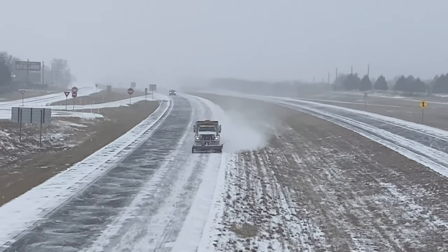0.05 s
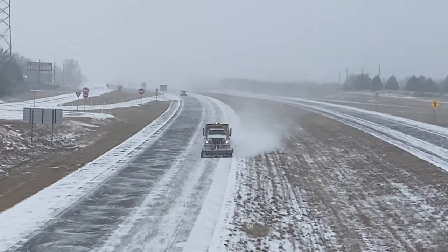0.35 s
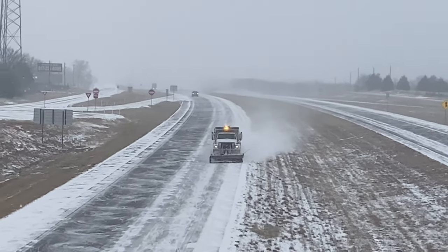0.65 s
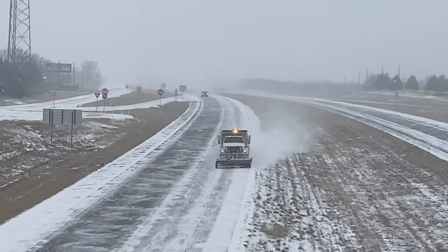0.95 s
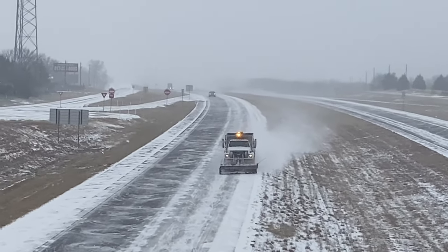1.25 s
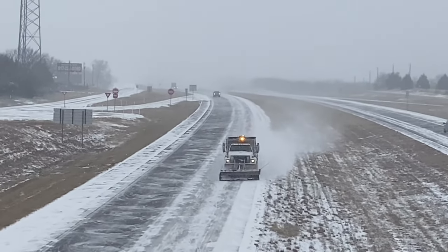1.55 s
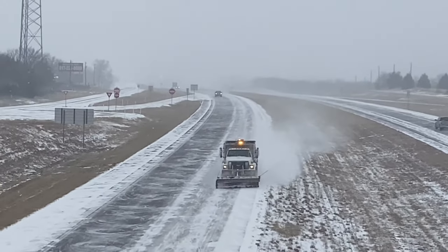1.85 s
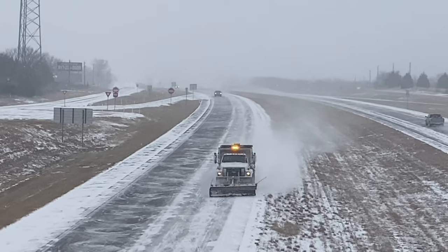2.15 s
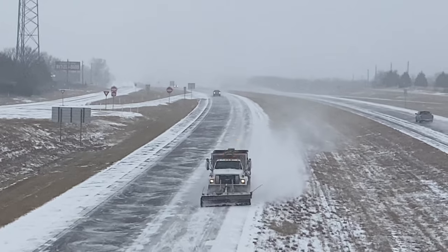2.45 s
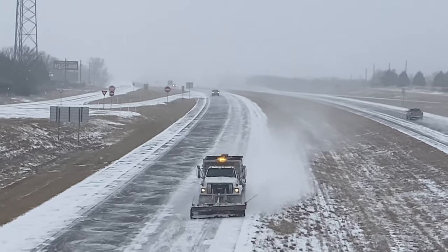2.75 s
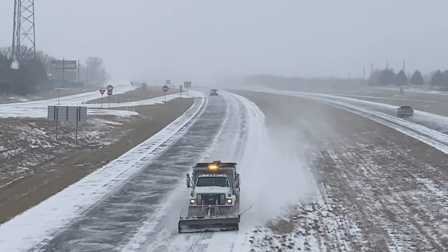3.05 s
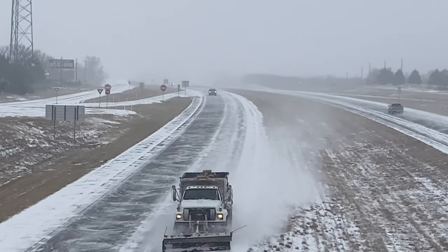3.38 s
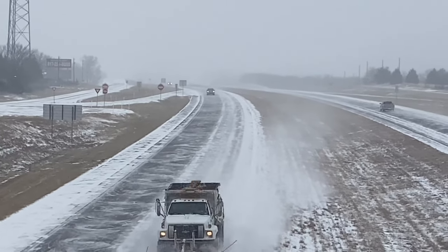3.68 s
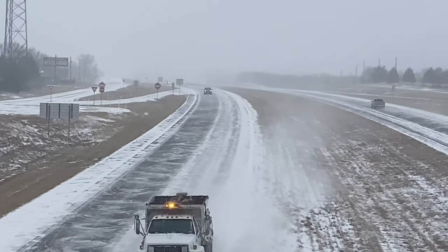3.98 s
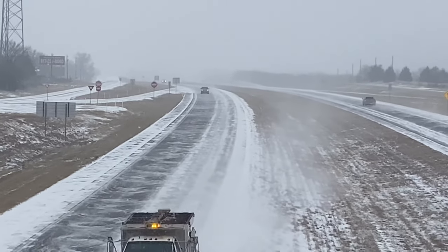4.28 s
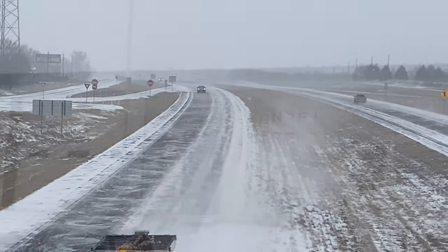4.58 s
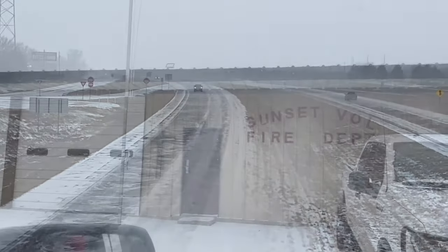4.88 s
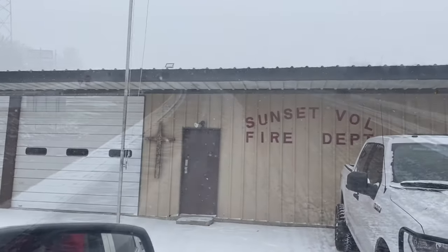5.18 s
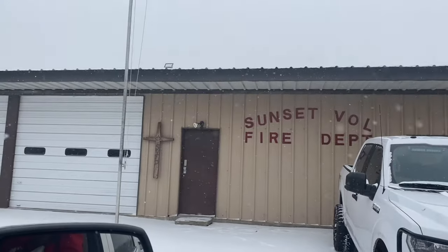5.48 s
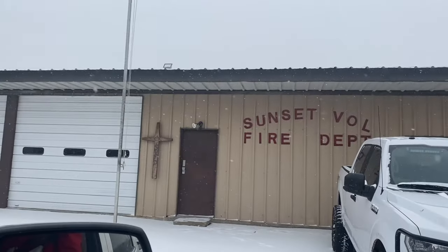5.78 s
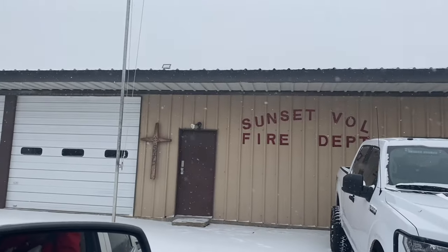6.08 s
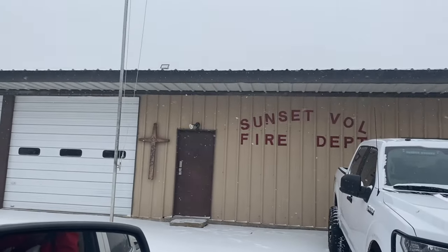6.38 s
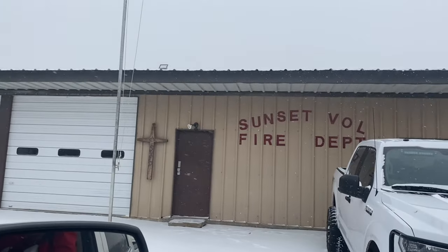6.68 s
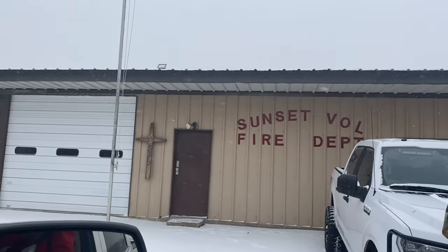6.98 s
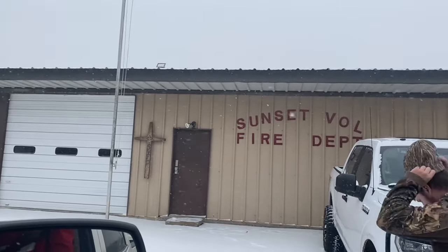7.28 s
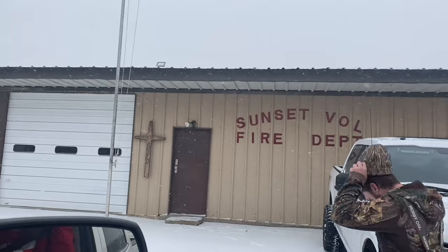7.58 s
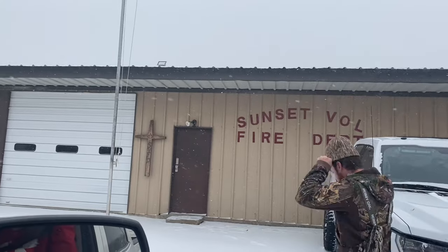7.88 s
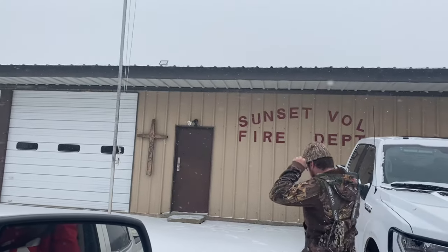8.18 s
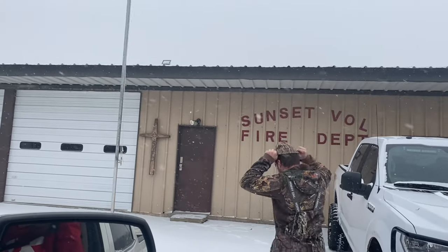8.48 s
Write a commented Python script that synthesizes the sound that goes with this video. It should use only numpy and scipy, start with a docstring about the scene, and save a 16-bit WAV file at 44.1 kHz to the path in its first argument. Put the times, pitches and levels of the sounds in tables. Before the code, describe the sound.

Heard from inside an idling car, a snowplough approaches, its diesel drone and tyre roar growing as the steel blade scrapes, clangs and briefly squeals on the road. The plough fades as heater air comes in. A jacket rustles, then two doors slam one after the other, booming in the cabin. Small ticks, soft bumps and faint steps in snow follow over the idle.

```python
"""A diesel drones and a steel blade scrapes and jolts along the road: a snowplough nears an idling car,
dulled by the windows. Exhaust pulses make the drone; friction and impacts excite the blade's resonances.
The scene dissolves to a parked cabin where air rushes from the heater. A jacket slides off a seat, two
doors slam and set the enclosed air booming in its modes, and ticks, soft bumps and faint steps follow."""
import sys
import numpy as np
from scipy import signal
from scipy.fft import rfft, irfft, next_fast_len
from scipy.io import wavfile
from scipy.ndimage import map_coordinates

SR = 44100
rng = np.random.default_rng(int(sys.argv[2]) if len(sys.argv) > 2 else 0)


def unload_wav(signal):
    """Save mono or channel-first audio to the path in sys.argv[1] as 16-bit WAV at rate SR, clipped to [-1, 1]."""
    wavfile.write(
        sys.argv[1],
        SR,
        np.round(np.clip(np.atleast_2d(signal).T, -1, 1) * 32767).astype(np.int16),
    )


N = 381024
TIME = np.arange(N) / SR


def amp(db):
    return 10 ** (np.asarray(db) / 20)


def unit(x):
    return x / np.sqrt(np.mean(x ** 2) + 1e-20)


def along(points, hz):
    """Interpolates (Hz, value) points on a logarithmic frequency axis."""
    f, v = np.transpose(points)
    return np.interp(np.log(hz + 1), np.log(f + 1), v)


def curve(points):
    """Interpolates (seconds, value) points at every sample."""
    return np.interp(TIME, *np.transpose(points))


def ramp(start_s, end_s):
    """Rises from 0 to 1 between two times."""
    return np.clip((TIME - start_s) / (end_s - start_s), 0, 1)


def wobble(rate, t=TIME):
    """A smooth random curve with `rate` knots a second."""
    return map_coordinates(rng.standard_normal(int(t[-1] * rate) + 4), [t * rate])


def filtered(x, response):
    """Multiplies the spectrum of x by a frequency response."""
    n = x.shape[-1]
    m = next_fast_len(n + 8192, real=True)
    return irfft(rfft(x, m) * response(np.fft.rfftfreq(m, 1 / SR)), m)[..., :n]


def sides(lean_db):
    """Left and right gains for an interaural level difference."""
    return amp(np.array([np.atleast_1d(lean_db), -np.atleast_1d(lean_db)]) / 2)


def coloured(pair, spectrum, coherence):
    """Mid-side mixing: two independent noises become stereo with a set spectrum and correlation."""
    turn = lambda hz: np.arccos(np.clip(along(coherence, hz), -1, 1)) / 2
    mid, side = filtered(pair, lambda hz: amp(along(spectrum, hz)) * [np.cos(turn(hz)), np.sin(turn(hz))])
    return unit(np.array([mid + side, mid - side]))


def rush(spectrum, coherence, samples=N):
    """Steady stereo noise."""
    return coloured(rng.standard_normal((2, samples)), spectrum, coherence)


def grainy(spectrum, coherence, rate, spread_db):
    """Random amplitude modulation breaks stereo noise into grains."""
    return coloured(rng.standard_normal((2, N)) * amp(spread_db * wobble(rate)), spectrum, coherence)


def rise(t, attack):
    """Exponential onset with a time constant in seconds."""
    return 1 - np.exp(-t / attack)


def impact(t, attack, t60, tail_db, tail_t60):
    """Double-slope decay: a fast rise, a quick fall and a weaker tail."""
    return rise(t, attack) * (amp(-60 * t / t60) + amp(tail_db - 60 * t / tail_t60))


def blows(times, levels_db, attack, t60):
    """The envelope of many impacts; being incoherent, they add in power."""
    power = np.zeros(N + SR)
    shape = impact(TIME[:SR], attack, t60, tail_db=-60, tail_t60=0.3)
    for s, db in zip(times, levels_db):
        power[round(s * SR):][:SR] += (amp(db) * shape / shape.max()) ** 2
    return np.sqrt(power[:N])


def strokes(times, lengths, levels_db, attack, t60):
    """The envelope of strokes that rise, hold and decay, adding in power."""
    t, power = TIME[:2 * SR], np.zeros(N + 2 * SR)
    for s, length, db in zip(times, lengths, levels_db):
        shape = rise(t, attack) * amp(-60 * np.maximum(t - length, 0) / t60)
        power[max(round(s * SR), 0):][:2 * SR] += (amp(db) * shape) ** 2
    return np.sqrt(power[:N])


def modes(hz, gains, t):
    """Sinusoids of random phase, one a row, with a fixed total power."""
    phase = rng.uniform(0, 2 * np.pi, hz.shape)
    return gains / np.linalg.norm(gains) * np.sin(2 * np.pi * hz * t + phase)


def add(track, s, sound):
    """Mixes a short sound into a stereo track at time s."""
    room = track[:, round(s * SR):][:, :sound.shape[-1]]
    room += sound[..., :room.shape[1]]


# Interaural coherence of sound from outside the car. Each row: frequency in Hz, correlation.
OUTSIDE = [(50, 0.96), (150, 0.96), (500, 0.79), (1500, 0.78), (4000, 1)]
# The diesel's firing. Each row: time in seconds, firing rate in Hz.
FIRING_RATE = [(0, 122), (1.2, 123), (2.6, 119), (3.4, 118), (4.0, 119), (4.5, 121), (5.2, 112)]
# Spectra of the exhaust pipe and the tyres. Each row: frequency in Hz, relative level in dB.
PIPE_SPECTRUM = [(50, -41.5), (105, 6.5), (120, 8.5), (140, 4.5), (240, -13), (400, -2), (700, -61),
                 (3000, -120)]
TYRE_SPECTRUM = [(15, -53), (60, -23.5), (100, 3.5), (160, -0.5), (205, -7), (255, 1), (310, -14),
                 (420, -9), (700, -21), (1500, -61.5), (4000, -120)]
# The truck's roar swells and sinks. Each row: time in seconds, gain in dB.
ROAR_SWELL = [(0, 6), (1.3, 1.5), (1.7, 2), (2.1, -4), (2.65, -1), (2.95, 1), (3.45, 0), (3.8, -1.5),
              (4.25, 0), (4.75, 0)]
def truck():
    """Spherical spreading: exhaust pulses and tyre roar vary in amplitude inversely with distance."""
    pass_s, speed_m_per_s, nearest_m = 4.15, 23.3, 12.6
    nearness = nearest_m / np.hypot(nearest_m, speed_m_per_s * (TIME - pass_s))
    cycles = np.cumsum(curve(FIRING_RATE) * (1 + 0.04536 * wobble(40))) / SR
    firings = np.diff(np.floor(cycles), prepend=0) * amp(4.8 * wobble(50))
    drone = unit(filtered(firings, lambda hz: amp(along(PIPE_SPECTRUM, hz))))
    exhaust = amp(-32) * unit(drone + 0.5 * rush(PIPE_SPECTRUM, OUTSIDE))
    ruts_db = 2.5 * wobble(32)  # the tyres thud over packed snow
    tyres = amp(-32 + 1.5 * wobble(6.2) + ruts_db) * rush(TYRE_SPECTRUM, OUTSIDE)
    return nearness * amp(curve(ROAR_SWELL)) * (exhaust + tyres)


# The blade's resonances, whose strengths depend on the angle of view.
# Each row: frequency in Hz, bandwidth in Hz, gain from afar in dB, gain from nearby in dB.
STEEL_MODES = [(268.8, 6.7, 21, 4), (408, 73, 7.5, 13.5), (521.2, 18, 17, -7.5), (682, 41, -7, 5.5),
               (762.4, 25, 0.5, 10.5), (827.3, 18, 9, 3.5), (1001, 5.9, 13.5, 0), (1032, 13, 5, 4),
               (1259, 24, 4.5, 11), (1323, 44, -11, 8.5), (1550, 56, 8, 7.5), (1668, 44, 1.5, 9.5),
               (1984, 5.8, 0.5, 13.5), (2298, 37, 6.5, 7.5), (2464, 200, 6.5, -3)]
FLEX_PER_S, FLEX_SHARE, FLEX_DB = 14, 0.011, 3.6  # pace of the flexing, swing of pitch, swing of gain
def through_steel(x, modes_db, treble_db):
    """Resonant filtering: each mode wanders as the blade flexes, and a shelf sets the treble."""
    f, t, spectra = signal.stft(x.astype(np.float32), SR, nperseg=4096)
    f, power = f[:, None], 1
    for (hz, width, *_), db in zip(STEEL_MODES, modes_db):
        centre = hz * (1 + FLEX_SHARE * wobble(FLEX_PER_S, t))
        strength = unit(amp(FLEX_DB * wobble(FLEX_PER_S, t)))
        power = power + (amp(db) * strength) ** 2 / (1 + (2 * (f - centre) / width) ** 2)
    shelf = amp(treble_db * np.minimum(f / 4000, 1) ** 4)
    return signal.istft(spectra * shelf * np.sqrt(power), SR, nperseg=4096)[1][..., :N]


# The blade bites into the asphalt.
# Each row: start in seconds, length in seconds, scrape level in dB, grit relative to the scrape in dB.
BITES = [(0.073, 0.52, -40, -40), (0.587, 0.35, -43, -12), (0.961, 0.038, -36, -17), (1.1, 0.1, -40.5, -22),
         (1.243, 0.14, -36, -18), (1.425, 0.26, -33, -12), (1.736, 0.059, -34, -7.5),
         (1.843, 0.037, -36, -5.5), (1.89, 0.25, -49.5, -5.5), (2.175, 0.069, -38, -12.5),
         (2.247, 0.14, -35, -21.5), (2.494, 0.032, -37, -8), (2.561, 0.026, -37, -8.5),
         (2.681, 0.15, -38.5, -13), (2.861, .25, -33, -17.5), (3.119, 0.17, -35.5, -7),
         (3.292, 0.022, -29.5, -13), (3.326, 0.015, -30.5, -3.5), (3.422, 0.025, -28.5, -9.5),
         (3.375, .04, -47, -12), (3.462, .085, -39.5, -15), (3.55, 0.058, -31, -10),
         (3.604, 0.042, -34, -12), (3.716, 0.25, -35.5, -11.5), (3.977, 0.13, -37, -5),
         (4.128, 0.24, -36, -11), (4.362, 0.17, -37.5, -13), (4.54, 0.23, -33.5, -15)]
# The blade jolts on the road. Each row: start in seconds, level in dB, centre of the ringing in Hz.
JOLTS = [(0.096, -29, 523), (0.163, -31, 825), (0.265, -34.5, 810), (0.488, -27, 530), (0.598, -29.5, 503),
         (0.672, -32, 530), (0.802, -28.5, 820), (0.953, -23.5, 517), (1.1, -27.5, 1030),
         (1.192, -25.5, 517), (1.228, -26, 517), (1.427, -21, 495), (1.468, -23, 516), (1.719, -22.5, 1000),
         (1.804, -22, 1300), (1.847, -23, 814), (2.42, -21, 480), (2.488, -25, 480), (2.592, -26.5, 400),
         (2.784, -24, 835), (2.861, -26.5, 785), (2.934, -23, 763), (3.038, -19.5, 910),
         (3.153, -18.5, 860), (3.344, -26.5, 400), (3.431, -16, 400), (3.557, -21.5, 400),
         (3.609, -23, 402), (3.89, -26, 400), (4.041, -21.5, 400), (4.298, -22, 980), (4.5, -26.5, 1260)]
# Spectra of the scrape and its gritty edge. Each row: frequency in Hz, relative level in dB.
SCRAPE_SPECTRUM = [(20, -58), (150, -29.5), (250, -12), (380, -2.5), (520, -3.5), (650, -2), (1000, -2),
                   (1400, -5.5), (1750, -16.5), (2200, -34.5), (3200, -27), (4200, -75), (8000, -120)]
GRIT_SPECTRUM = [(600, -39), (1400, 6.5), (2000, 5.5), (2500, 4), (3100, 1), (3700, -17.5), (4400, -18),
                 (4800, -32.5), (5300, -35.5), (6200, -45), (7500, -46), (9000, -62.5), (12000, -66.5)]
def blade():
    """Forced vibration: friction noise from dragging, biting and jolting drives the steel's modes."""
    drag_db, drag_grit_db = -42, -55
    start, length, bite_db, grit_db = np.transpose(BITES)
    scrape = np.hypot(amp(drag_db), strokes(start, length, bite_db, attack=0.005, t60=0.27))
    rasp = np.hypot(amp(drag_grit_db), strokes(start, length, bite_db + grit_db, attack=0.005, t60=0.27))
    jolt_s, jolt_db, _ = np.transpose(JOLTS)
    chatter = unit(amp(0.3 * wobble(15) + 0.8 * wobble(50) + 1.5 * wobble(140)))
    # The edge eases off the road just before each jolt.
    lift = blows(jolt_s - 0.02, np.full_like(jolt_s, -7), attack=0.01, t60=0.05)
    contact = chatter / (1 + lift)
    body = np.hypot(scrape * contact, blows(jolt_s, jolt_db - 9.5, attack=0.001, t60=0.087))
    edge = np.hypot(rasp * contact, blows(jolt_s, jolt_db - 33.5, attack=0.0026, t60=0.12))
    grind = grainy(SCRAPE_SPECTRUM, OUTSIDE, rate=600, spread_db=1.5)
    grit = grainy(GRIT_SPECTRUM, OUTSIDE, rate=560, spread_db=1.5)
    # The distant timbre, its treble absorbed by the air, gives way to the near one.
    near = ramp(1.4, 4.23)
    _, _, far_db, near_db = np.transpose(STEEL_MODES)
    out = np.zeros((2, N))
    for share, modes_db, treble_db in (1 - near, far_db, -4), (near, near_db, 1):
        low, high = through_steel(np.array([grind, grit]), modes_db, treble_db)
        out += share * (body * unit(low) + edge * unit(high))
    return out


# Interaural coherence of sound in the cabin. Each row: frequency in Hz, correlation.
INSIDE = [(45, 1), (100, 0.51), (250, 0.028), (1000, 0.041), (5000, 0.065)]
# The cabin's rumble. Each row: frequency in Hz, relative level in dB.
RUMBLE_SPECTRUM = [(15, -25), (30, -20.5), (42, -20.5), (54, 0.5), (70, -4), (95, -7), (130, -14.5),
                   (220, -16.5), (300, -29), (600, -33), (1200, -86), (3000, -120)]
def idle():
    """Structure-borne sound: the car's engine hums at its firing rate and shakes the cabin."""
    firing_hz, fall_db_per_s = 42.83, 0.23
    phase = 2 * np.pi * np.cumsum(firing_hz * (1 + 0.0039 * wobble(15))) / SR
    fundamental = amp(-37 + wobble(6.9)) * np.sin(phase)
    octave = amp(-47 + 2.4 * wobble(4.6)) * np.sin(2 * phase)
    rumble_db = -37 - fall_db_per_s * TIME + 1.4 * wobble(5.4)
    return fundamental + octave + amp(rumble_db) * rush(RUMBLE_SPECTRUM, INSIDE)


# Faint flares of bright hiss. Each row: start in seconds, length in seconds, level in dB.
HISS_FLARES = [(0.015, 0.71, -81.5), (0.113, 0.12, -81.5), (0.599, 0.016, -72), (0.663, 0.051, -79),
               (1.869, 0.013, -73), (2.184, .17, -83.5), (2.592, 0.017, -71), (2.662, .19, -76.5),
               (2.747, 0.032, -68), (2.935, 0.016, -63), (4.033, 0.08, -72), (4.184, 0.022, -63),
               (4.278, .025, -66)]
# Their spectrum. Each row: frequency in Hz, relative level in dB.
FLARE_SPECTRUM = [(2500, -30.5), (3500, -9), (3850, 5.5), (4450, 1.5), (4800, -20), (6000, -39.5)]
def hiss_flares():
    """Amplitude-modulated band noise: faint flares of bright hiss near 4 kHz during the scrape."""
    envelope = strokes(*np.transpose(HISS_FLARES), attack=0.007, t60=0.14)
    return envelope * grainy(FLARE_SPECTRUM, OUTSIDE, rate=240, spread_db=4)


def clangs():
    """Free vibration: after each jolt the blade's modes ring on, favouring those near its pitch."""
    ring_t60, tilt_db_per_octave = 0.19, -16.5
    out, t = np.zeros((2, N)), TIME[:SR // 2]
    hz, _, far_db, near_db = np.transpose(STEEL_MODES)[:, :, None]
    for s, db, centre_hz in JOLTS:
        octaves_off = np.abs(np.log2(hz / centre_hz))
        gains = amp((far_db + near_db) / 4 + tilt_db_per_octave * octaves_off + rng.normal(0, 2.2, hz.shape))
        flexed_hz = hz * (1 + FLEX_SHARE * rng.standard_normal(hz.shape))
        envelope = amp(db - 8 - 60 * t / ring_t60) * rise(t, 0.002)
        add(out, s, envelope * modes(flexed_hz, gains, t).sum(axis=0))
    return out


# Soft blows on the car's body. Each row: start in seconds, level in dB, frequency in Hz.
BUMPS = [(0.308, -21, 133), (3.009, -21, 72.3), (4.46, -14, 63), (4.654, -16.5, 64), (6.088, -23, 140),
         (6.165, -30, 136), (6.637, -31, 67.5), (7.112, -26.5, 87), (7.54, -28, 80), (7.687, -26, 135),
         (8.594, -27.5, 58)]
# A dull knock on the body or a door. Each row: frequency in Hz, relative level in dB.
KNOCK_SPECTRUM = [(15, -34), (50, -14.5), (100, 11.5), (150, 1), (230, -1.5), (330, -10.5), (480, -17),
                  (1000, -66), (4000, -120)]
def bumps():
    """Heavy damping: the body swings once or twice, with a dull puff that grows with the pitch."""
    out, t = np.zeros((2, N)), TIME[:SR // 4]
    for s, db, hz in BUMPS:
        swell = t * hz / 0.67
        add(out, s, amp(db) * swell * np.exp(1 - swell) * np.sin(2 * np.pi * hz * t))
    s, db, hz = np.transpose(BUMPS)
    puffs = blows(s, db + 9 * np.log2(hz / 170), attack=0.0031, t60=0.088)
    return out + puffs * rush(KNOCK_SPECTRUM, OUTSIDE)


# The blade sings. Each row: start in seconds, length in seconds, level in dB, pitch in Hz,
# waver as a share of the pitch.
SQUEALS = [(1.465, 0.24, -40, 408.2, 0.0055), (1.56, 0.074, -37, 1008, 0.012),
           (1.578, 0.11, -41, 825, .012), (1.736, 0.034, -37.5, 1013, 0.0038),
           (1.78, 0.032, -41, 762, 0.0063), (1.853, 0.11, -49, 822, 0.0056),
           (2.253, 0.08, -41.5, 993, 0.0058), (2.258, 0.051, -39.5, 804, 0.014),
           (2.76, 0.04, -42, 828, 0.013), (2.92, 0.11, -44.5, 760, 0.007), (3.025, 0.18, -43, 1285, .02),
           (3.14, 0.053, -40.5, 1100, 0.011), (3.3, 0.031, -36, 878, .025), (4.34, 0.47, -44.5, 797, 0.021),
           (4.578, .04, -39.5, 630, 0.0147), (4.66, 0.053, -40, 1308, 0.012)]
def squeals():
    """Stick-slip friction: the catching edge sustains rough, wavering notes."""
    out = np.zeros(N)
    for s, length, db, hz, waver in SQUEALS:
        phase = 2 * np.pi * np.cumsum(hz * (1 + waver * wobble(90))) / SR
        tone = unit(amp(1.5 * wobble(45)) * np.sin(phase))
        out += strokes([s], [length], [db], attack=0.011, t60=0.25) * tone
    return out


# Snow flies off the blade. Each row: start in seconds, length in seconds, level in dB.
SPRAYS = [(3.336, 0.21, -85), (4.035, 0.08, -74.5), (4.13, 0.22, -78)]
# Its spectrum. Each row: frequency in Hz, relative level in dB.
SPRAY_SPECTRUM = [(3000, -6), (5000, 6.5), (5800, -12), (7300, -3), (8300, -18.5), (12000, -37.5)]
def snow_spray():
    """Granular noise: fine grains of thrown snow merge into a hiss."""
    envelope = strokes(*np.transpose(SPRAYS), attack=0.012, t60=0.16)
    return envelope * grainy(SPRAY_SPECTRUM, OUTSIDE, rate=200, spread_db=3)


# Air leaving the vents. Each row: frequency in Hz, relative level in dB.
VENT_SPECTRUM = [(60, -23), (160, -17.5), (280, -4), (410, -3.5), (560, -2.5), (790, -8.5), (1200, -12),
                 (1950, -16.5), (2420, -12.5), (2900, -17), (3500, -27), (4900, -24.5), (5700, -32.5),
                 (6500, -30), (7300, -40.5), (8200, -37.5), (9200, -56), (12000, -77.5)]
def heater():
    """Turbulent flow hisses from the vents while the blower's bearing chirps at random times."""
    chirp_hz, chirp_s = 4760, 0.016
    out = amp(-51 + 0.5 * wobble(5)) * rush(VENT_SPECTRUM, INSIDE) * sides(2.9)
    t = TIME[:SR // 20]
    swell = np.sin(np.pi * np.minimum(t / chirp_s, 1)) ** 2
    for when, pitch, glide, strength, side in rng.uniform(-1, 1, size=(170, 5)):
        hz = chirp_hz * (1 + 0.02 * pitch + 0.02 * glide * t / chirp_s)
        chirp = amp(-66.5 + 4.4 * strength) * swell * np.sin(2 * np.pi * np.cumsum(hz) / SR)
        add(out, (when + 1) / 2 * N / SR, chirp * sides(4 * side))
    return out


# A jacket slides over the seat, then stirs. Each row: start in seconds, length in seconds, level in dB.
JACKET_PULLS = [(4.604, 0.11, -50.5), (4.746, 0.086, -50), (4.89, 0.093, -64), (6.62, 0.089, -73),
                (7.15, 0.09, -75), (7.917, .07, -66), (8.295, 0.24, -70)]
# Its creases snap. Each row: start in seconds, level in dB.
CREASES = [(4.625, -31.5), (4.6932, -41), (4.748, -41), (4.775, -40.5), (4.862, -34), (4.873, -39),
           (4.9, -39)]
# The cloth's spectrum. Each row: frequency in Hz, relative level in dB.
CLOTH_SPECTRUM = [(1290, -30), (2200, -5), (2680, -2.5), (3260, -5), (3850, -2), (6200, -4.5), (9130, -15),
                  (11900, -93), (20100, -120)]
def jacket():
    """Friction and buckling: stiff cloth rubs in fine grains and snaps at its creases."""
    s, db = np.transpose(CREASES)
    rubs = strokes(*np.transpose(JACKET_PULLS), attack=0.02, t60=0.17)
    snaps = blows(s, db - 6.5, attack=0.0022, t60=0.081)
    return np.hypot(rubs, snaps) * grainy(CLOTH_SPECTRUM, INSIDE, rate=2000, spread_db=3) * sides(1.5)


# Latches, seals and trim strike as the doors shut. Each row: start in seconds, clack level in dB,
# clack pitch in Hz, crack level in dB, knock level in dB, left minus right in dB.
DOOR_CONTACTS = [(5.096, -18.5, 630, -39, -35, -3.5), (5.108, -15, 940, -27.5, -21, -1),
                 (5.114, -16.5, 479, -36.5, -17.5, -12.5), (5.119, -16, 250, -46, -30, -2),
                 (5.136, -21.5, 560, -33.5, -20, -3.5), (5.159, -29, 1190, -36, -17.5, 3.5),
                 (5.239, -41.5, 1180, -67, -38, -11), (5.32, -41.5, 596, -58.5, -41, 6),
                 (5.822, -34, 700, -61.5, -26, -1.5), (5.829, -23.5, 800, -49, -23, 3),
                 (5.843, -12.5, 1046, -24.5, -17, -1), (5.847, -9, 334, -33.5, -10.5, 1),
                 (5.871, -20.5, 330, -34.5, -11.5, -2), (5.88, -29.5, 1300, -41.5, -34, 1),
                 (5.899, -24, 324, -43, -20.5, -1), (5.908, -31, 1470, -46, -35, 0),
                 (5.917, -33, 590, -42.5, -23, 8.5), (5.935, -29.5, 940, -47.5, -37, 0),
                 (5.945, -31, 1040, -53, -38, -4), (5.981, -38.5, 1050, -59, -35, -7),
                 (6.089, -34.5, 690, -48, -26.5, 9.5), (6.166, -55, 330, -57, -35.5, 5)]
# The door panels' modes. Each row: frequency on the first door in Hz, on the second door in Hz,
# relative level in dB, 60 dB decay time in seconds.
PANEL_MODES = [(216, 235, 6, .2), (294, 250, 1, 0.12), (422, 340, -2, .18), (519, 570, -4, 0.21),
               (638, 710, -5, 0.16), (778, 950, -5.5, 0.14), (954, 1060, -2.5, 0.11),
               (1040, 1400, -14, 0.15), (1220, 1450, -5, 0.093)]
# Spectra of a part's clack and the latch's crack. Each row: frequency in Hz, relative level in dB.
CLACK_SPECTRUM = [(120, -24), (300, 8.5), (480, 5.5), (680, 0), (900, -5.5), (1300, -7), (1600, -11),
                  (1900, -11), (2600, -20.5), (5000, -63), (9000, -120)]
CRACK_SPECTRUM = [(900, -28.5), (2000, 2), (2800, 4), (4000, -1), (6000, -4), (8300, -15), (9100, -23.5),
                  (9800, -41), (12000, -42.5)]
# Interaural coherence of the doors. Each row: frequency in Hz, correlation.
DOOR_COHERENCE = [(60, 0.36), (300, 0.24), (1000, 0.13), (5000, .06)]
def doors():
    """Impact excitation: each contact cracks the latch, clacks a part, and knocks and rings a panel."""
    second_door_s = 5.6
    out, t = np.zeros((2, N)), TIME[:SR // 2]
    noise = lambda spectrum: rush(spectrum, DOOR_COHERENCE, len(t))
    first_hz, second_hz, mode_db, mode_t60 = np.transpose(PANEL_MODES)[:, :, None]
    for s, clack_db, clack_hz, crack_db, knock_db, lean_db in DOOR_CONTACTS:
        resonance = lambda f: 1 + amp(7.5) / (1 + (np.log2((f + 1) / clack_hz) / 0.22) ** 2)
        clack = amp(clack_db + 4.5) * unit(filtered(noise(CLACK_SPECTRUM), resonance))
        clack *= impact(t, attack=0.00074, t60=0.044, tail_db=-22.5, tail_t60=0.45)
        crack = amp(crack_db + 0.5) * noise(CRACK_SPECTRUM)
        crack *= impact(t, attack=0.00035, t60=0.074, tail_db=-24, tail_t60=0.66)
        knock = amp(knock_db + 6) * noise(KNOCK_SPECTRUM)
        knock *= impact(t, attack=0.0026, t60=0.074, tail_db=-19, tail_t60=0.6)
        hz = second_hz if s > second_door_s else first_hz
        gains = resonance(hz) * amp(mode_db + rng.normal(0, 1, hz.shape))
        panel = modes(hz, gains, t) * amp(-60 * t / mode_t60)
        ring = amp(clack_db - 7.5) * panel.sum(axis=0) * rise(t, 0.0015)
        add(out, s, (clack + crack + knock + ring) * sides(lean_db))
    return out


# The doors and the rocking body push the cabin's air. Each row: start in seconds, level in dB,
# factor on the modes' frequencies, factor on their interaural phase.
AIR_PUSHES = [(5.117, -9.5, 0.91, 1.7), (5.846, -11, 1.04, 1.7), (5.887, -10.5, 0.97, 3.55),
              (5.979, -14.5, 1.08, .3), (6.094, -24, 1.2, 0.25)]
# The cabin's air modes. Each row: frequency in Hz, level in dB, 60 dB decay time in seconds,
# interaural phase in radians.
AIR_MODES = [(31.6, -2, 0.26, 2), (56.35, 4, 0.46, 0.56), (80.7, -4.5, 0.087, 1.6),
             (95.4, -11.5, 0.25, 3.5), (133, -13, 0.098, 0.85), (197, -26, 0.18, 0.8),
             (220, -25, 0.091, 0.83), (326.5, -21.5, 0.33, 1.4)]
def cabin_boom():
    """Cavity resonance: the enclosed air rings at its modes, out of step at the two ears."""
    out, t = np.zeros((2, N)), TIME[:SR]
    for s, push_db, pitch, apart in AIR_PUSHES:
        ring = np.zeros((2, len(t)))
        for hz, db, t60, lag in AIR_MODES:
            ear_phase = apart * np.array([[lag], [-lag]]) / 2
            decay = amp(db + rng.normal(0, 1) - 60 * t / t60)
            ring += decay * np.sin(2 * np.pi * pitch * hz * t + ear_phase)
        add(out, s, amp(push_db) * ring * rise(t, 0.01))
    return out


# Ticks in the cabin. Each row: start in seconds, ring in dB, click in dB, left minus right in dB.
TICKS = [(5.437, -66, -53, -4), (6.104, -58, -62.5, 1), (6.216, -51, -60, -2), (6.236, -36, -58, 5.5),
         (6.451, -62, -47, 4), (7.112, -55, -59, -2)]
# A metal catch's modes. Each row: frequency in Hz, level in dB, 60 dB decay time in seconds.
CATCH_MODES = [(1930, -8, 0.025), (4160, -13, .015), (4980, 2, 0.012), (5470, 1.5, 0.012)]
# The dry click. Each row: frequency in Hz, relative level in dB.
CLICK_SPECTRUM = [(800, -18), (2000, 2), (4500, -0.5), (8000, -7), (9000, -16), (10500, -40)]
def ticks():
    """Brief contact gives a broad spectrum: small hard parts click and ring a metal catch."""
    out, t = np.zeros((2, N)), TIME[:SR // 10]
    for s, ring_db, click_db, lean_db in TICKS:
        ring = sum(amp(db - 60 * t / t60) * np.sin(2 * np.pi * hz * t) for hz, db, t60 in CATCH_MODES)
        click = rush(CLICK_SPECTRUM, INSIDE, len(t)) * amp(-60 * t / 0.028)
        add(out, s, (amp(ring_db) * ring + amp(click_db) * click) * rise(t, 0.00043) * sides(lean_db))
    return out


# Shoes scuff in the snow outside. Each row: start in seconds, level in dB.
SCUFFS = [(6.65, -45), (6.69, -46), (6.87, -51), (6.922, -43.5), (7.225, -53), (7.05, -51), (7.19, -49),
          (7.337, -48.5), (7.485, -51), (7.53, -49), (7.672, -53), (8.22, -50.5), (8.375, -47.5)]
# The crunch through shut doors. Each row: frequency in Hz, relative level in dB.
SNOW_SPECTRUM = [(100, -32), (330, -3), (650, -1.5), (1200, -13.5), (2000, -18.5), (3500, -22.5),
                 (8000, -76)]
def footsteps():
    """Granular compaction: snow crunches faintly underfoot."""
    s, db = np.transpose(SCUFFS)
    envelope = blows(s, db + 0.5, attack=0.007, t60=0.1)
    return envelope * grainy(SNOW_SPECTRUM, INSIDE, rate=320, spread_db=0.5)


# The cabin favours one ear for the plough. Each row: frequency in Hz, left minus right in dB.
CABIN_LEAN = [(60, -5), (140, 5.5), (400, 1), (1100, -3), (2500, 1)]
def scene():
    """Superposition: the sources add, the plough fading out just after the heater fades in."""
    highway = 1 - ramp(4.93, 5.49)
    parked = ramp(4.58, 4.85)
    plough = truck() + blade() + hiss_flares() + clangs() + squeals() + snow_spray()
    plough = filtered(plough, lambda hz: sides(along(CABIN_LEAN, hz)))
    car = idle() + bumps() + parked * heater() + jacket() + doors() + cabin_boom() + ticks()
    return highway * plough + car + footsteps()


# A faint hiss: its level and spectrum. Each row: frequency in Hz, relative level in dB.
HISS_DB, HISS = -84, [(3000, -2), (7500, -6), (10000, -13), (12000, -4.5)]
def record(dry):
    """Noise floor, saturation and band limit: hiss is added, peaks round off, the top treble is cut."""
    ceiling, top_hz = 0.95, 12400
    heard = dry + amp(HISS_DB) * rush(HISS, INSIDE)
    rounded = heard / (1 + np.abs(heard / ceiling) ** 6) ** (1 / 6)
    return filtered(rounded, lambda hz: hz < top_hz)


dry = scene()
out = record(dry)
unload_wav(out)
```